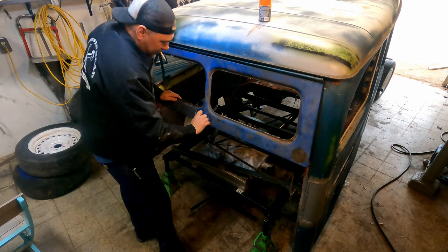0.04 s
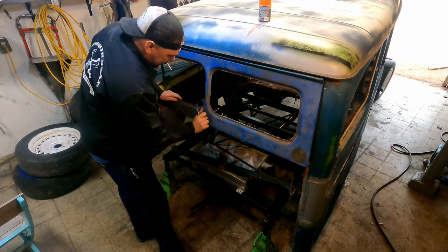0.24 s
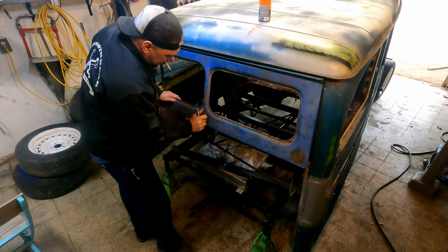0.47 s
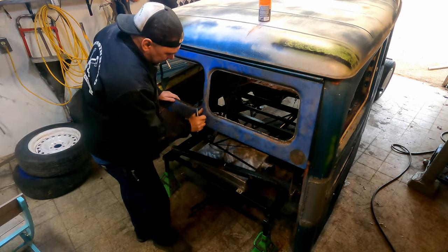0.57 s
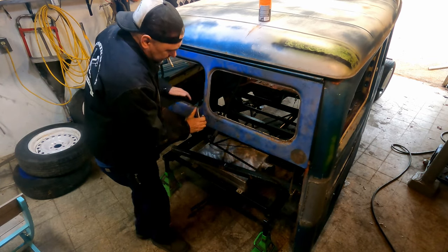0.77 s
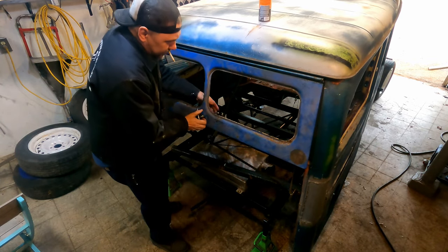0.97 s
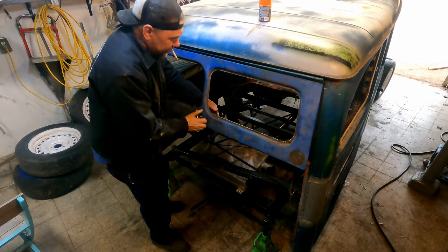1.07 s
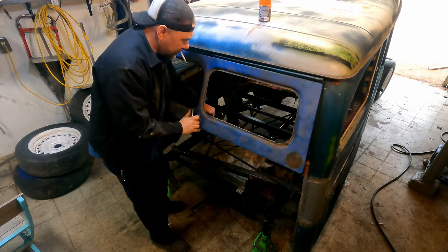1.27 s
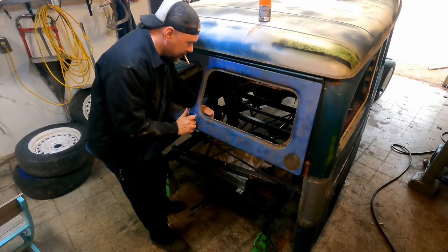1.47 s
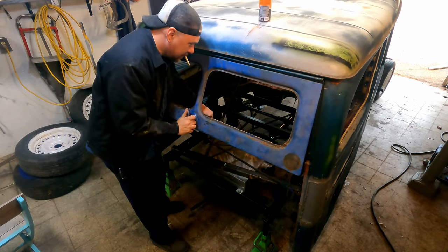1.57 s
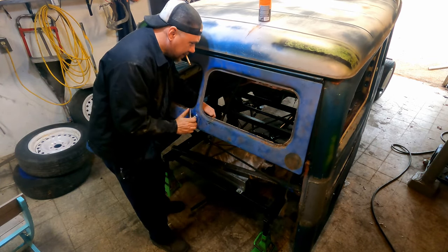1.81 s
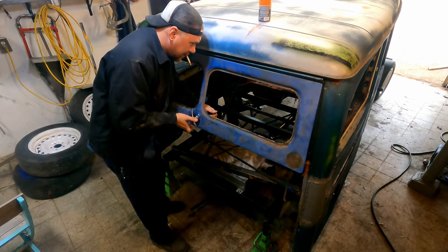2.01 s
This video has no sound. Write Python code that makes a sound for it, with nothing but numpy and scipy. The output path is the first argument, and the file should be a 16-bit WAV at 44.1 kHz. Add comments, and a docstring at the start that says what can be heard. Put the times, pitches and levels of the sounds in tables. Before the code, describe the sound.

A rusty crank handle is forced on a hollow steel car door, heard close in a small garage. Faint ticks first, then loud gritty clanks at 0.2 and 0.36 seconds, with a deep boom swelling until about 0.8. A tiny chirp at 0.7, softer scrapes near 0.9 and 1.06, a clunk with thin squeak at 1.55, and an abrupt dull thump at 1.74. Low airy rumble and faint hum continue behind.

```python
"""In a garage, a stiff rusty crank handle on a hollow steel car door is forced back and forth.
Each jerk rattles and scrapes the door skin: random grit excites noise bands and resonant modes.
The body booms low as a gliding sine with rough rumble, and the spindle squeaks in fluttering sine lines.
A tick and a low push make one thump; shaped noise and a faint hum lie behind, and feedback delays
give the garage its reverberation."""
import sys
import numpy as np
from scipy import signal
from scipy.fft import rfft, irfft
from scipy.io import wavfile

SR = 44100
rng = np.random.default_rng(int(sys.argv[2]) if len(sys.argv) > 2 else 0)


def transcribe(u):
    """Save the signal u as a 16-bit wav file named by the first command-line argument.

    u: samples, shape (n,) or (channels, n), limited to [-1, 1]; the rate is SR.
    q: integer samples, one column per channel.
    """
    v = np.clip(np.atleast_2d(u).T, -1, 1)
    q = np.round(v * 32767).astype(np.int16)
    wavfile.write(sys.argv[1], SR, q)


N = 90404

# Boom of the car body. Each row: time in seconds, level in dB, frequency in Hz.
BOOM_TRACK = [(0.0, -41, 66.7), (0.04, -28.5, 69.3), (0.07, -29.5, 68.0), (0.14, -44.5, 65.9),
              (0.23, -51, 71.3), (0.29, -39, 74.9), (0.34, -16.5, 69.7), (0.38, -14.5, 67.7),
              (0.42, -18, 66.4), (0.51, -13.5, 69.4), (0.63, -23.5, 67.3), (0.66, -13.5, 65.8),
              (0.75, -19, 68.1), (0.84, -33.5, 71.95), (0.89, -27.5, 73.2), (1.01, -24.5, 72.9),
              (1.05, -33.5, 72.1), (1.2, -34.5, 71.04), (1.27, -42.5, 72.9), (1.37, -29, 66.9),
              (1.41, -26.5, 66.5), (1.47, -42, 67.9), (1.52, -36, 68.4), (1.6, -36, 67.4),
              (1.63, -36.5, 67), (1.76, -44, 66.2), (1.79, -56, 67.8), (1.84, -32, 67.6), (1.92, -71.5, 66),
              (2.05, -31.5, 64.4)]
SHUDDER_DB, SHUDDER_LOW_HZ, SHUDDER_TOP_HZ = -7.5, 40, 67   # rumble, level relative to the boom tone
BOOM_SIDE_DB = -23

# Spectrum of the background noise. Each row: frequency in Hz, relative level per hertz in dB.
AIR_SPECTRUM = [(13, -35), (22, 0), (70, -1.5), (131, 1.5), (198, -11), (306, -12.5), (869, -30),
                (1050, -24), (1930, -23), (2830, -33.5), (5320, -30.5), (12100, -44), (15500, -84)]
# Slow swelling of the background. Each row: time in seconds, dB below AIR_SPLIT_HZ, dB above it.
AIR_SWELL = [(0, 2.5, -2), (0.199, -2.5, 3), (0.799, 10, 3.5), (1.0, 3, 1.5), (1.15, 4, 3), (1.3, 0, -1),
             (1.45, 4.5, 3.5), (1.75, 3.5, 3), (1.899, 3, 3), (2.05, -3.5, 2.5)]
AIR_DB, AIR_PATCHY_DB, AIR_SPLIT_HZ = -35, 0.8, 450
HUM_HZ, HUM_DB, HUM_WAVER_DB = 121.3, -38, 2.3

# Frequencies at which the level of each jerk is given, in Hz.
JERK_TONE_HZ = [300, 900, 2200, 5000, 10000]
# Jerks and scrapes of the handle. Each row: start in seconds, shortest rise in seconds, hold in seconds,
# decay t60 at 1000 Hz in seconds, then the level in dB at each of JERK_TONE_HZ.
JERKS = [(.046, 0.0031, 0.02, 0.31, -46.5, -43, -48.5, -52, -62.5),
         (.119, 0.0031, 0.0021, 0.026, -45.5, -64, -47, -44.5, -94),
         (.155, 0.012, 0.054, 0.44, -53, -52.5, -56, -76, -79),
         (0.215, .004, 0.016, 0.27, -30.5, -16.5, -18.5, -24, -62.5),
         (.258, 0.0028, 0.038, 0.28, -29.5, -26.5, -25.5, -44, -54.5),
         (0.355, 0.0035, 0.02, 0.23, -34, -22.5, -18, -24.5, -48.5),
         (0.364, 0.00413, 0.014, 0.5, -16, -21.5, -22, -24.5, -71),
         (0.604, 0.032, 0.043, 0.39, -39.5, -40.5, -33, -34, -50.5),
         (0.798, 0.021, .060, 0.59, -44, -59.5, -71, -74, -85),
         (.888, 0.015, 0.016, 0.35, -48.5, -54.5, -46, -44.5, -54),
         (1.063, 0.0086, 0.027, 0.32, -41.5, -39.5, -31.5, -36, -53),
         (1.458, 0.031, 0.022, 0.82, -42, -38.5, -53, -61, -80),
         (1.538, 0.00373, 0.029, 0.25, -44.5, -33.5, -39.5, -39, -57.5),
         (1.547, 0.00598, 0.043, 0.54, -41, -26, -40.5, -60, -70),
         (1.682, 0.033, 0.017, 0.44, -32, -31.5, -53, -53.5, -77),
         (1.900, 0.043, 0.082, 0.47, -36, -49, -47.5, -99, -79)]
DECAY_TILT = -0.12   # t60 goes as (Hz / 1000) to this power
LOW_FALL_DB, HIGH_FALL_DB = 17, 28   # per octave outside JERK_TONE_HZ
LOW_LATE_S = 0.019   # added to the rise at 300 Hz, growing with the square of the period
GRITS_PER_S, GRIT_SPREAD_DB, GRIT_CLUMP_DB = 5000, 3, -1
# Modes of the door skin. Each row: frequency in Hz, relative level in dB, decay t60 in seconds.
SKIN_MODES = [(233, 0, 0.29), (266, -2, 0.217), (310.7, 4, 0.35), (400.4, -21.5, 0.45), (456, -1, 0.12),
              (659, -3, 0.17), (722, -7.5, 0.2), (930, -3, 0.11), (1019, -4, 0.13), (1118, -5.5, 0.13),
              (1316, -3, 0.21), (1582, -7.5, 0.11), (1787, -5, 0.3), (2233, -15, 0.14), (2490, -11.5, 0.2),
              (3193, -14.5, 0.18), (3715, -6, 0.18), (4283, -5, .04)]
SKIN_DB = -4
KNOCK_DB, KNOCK_RISE_S = 22.5, 0.0076   # the knock weakens by a factor e for each KNOCK_RISE_S of rise

# Lines of the squeak and of the short chirps and faint lines around it. Each row: start in seconds,
# hold in seconds, frequency in Hz, level in dB, decay t60 in seconds.
SQUEAK_LINES = [(1.57, .06, 1986, -34, .45), (1.541, .03, 3466, -43, .3), (1.541, .012, 4010, -40, .42),
                (1.541, .05, 4484, -44, .28), (1.541, .055, 4987, -43, .25), (1.541, .03, 5544, -41, .45),
                (1.375, .035, 1590, -50, .1), (1.462, .045, 4107, -56, .1), (1.40, .04, 5402, -58, .15),
                (1.548, .04, 1547, -30, .2), (.05, .015, 2600, -46, .08), (1.68, .04, 5100, -57, .3),
                (.688, .012, 2060, -32, .08), (.119, .003, 3700, -41, .04)]
SQUEAK_RISE_S, SQUEAK_FLUTTER_DB, SQUEAK_FLUTTER_HZ = 0.004, 3, 55
SPINDLE_LEAN_DB = -2   # left minus right

TICK_S, TICK_DB, TICK_HZ, TICK_T60_S = 1.7428, -9, 700, 0.010
SNAP_DB, SNAP_T60_S, SNAP_TOP_HZ = -25, 0.004, 7000
THUMP_S, THUMP_LENGTH_S, THUMP_DB = 1.7446, 0.0037, -3.5
THUMP_SKEW, REBOUND_HZ = 0.65, 22   # a skew below 1 brings the peak of the push forward

# Likeness of the two sides. Each row: frequency in Hz, left-right correlation from 0 to 1.
LIKENESS = [(60, 1), (130, 1), (290, 0.98), (640, 0.72), (1410, 0.67), (3100, 0.32), (6820, 0.99),
            (15000, 0.46)]
# Balance of the two sides. Each row: frequency in Hz, left minus right in dB.
LEAN = [(60, 2.5), (240, 0.5), (950, 0), (3770, 1), (15000, 2.5)]
LEFT_LAG_S = 0.000014
GARAGE_T60_S, GARAGE_DB, WALL_CUT_HZ = 0.31, -25.5, 6300   # t60 before the walls dull the treble
CEILING, CUTOFF_HZ = 1.1, 15750


def from_db(db):
    """Amplitude gain is ten to the power of a twentieth of the decibels."""
    return 10 ** (np.asarray(db) / 20)


def rms_one(x):
    """Normalise the signal power: scale to rms 1."""
    return x / np.sqrt(np.mean(x ** 2) + 1e-20)


def at_hz(points, hz):
    """Interpolate a table on a logarithmic frequency axis, linear in octaves."""
    table = np.array(points)
    return np.interp(np.log(hz), np.log(table[:, 0]), table[:, 1])


def drift(rate_hz):
    """Low-pass filtered noise varies slowly at random: two equal poles at rate_hz, rms 1."""
    step = 20  # computed at every 20th sample, then interpolated
    r = np.exp(-2 * np.pi * rate_hz * step / SR)
    white = rng.standard_normal(N // step + 2002)
    slow = rms_one(signal.lfilter([1], [1, -2 * r, r * r], white)[2000:])
    return np.interp(np.arange(N) / step, np.arange(len(slow)), slow)


def swell(start, rise, hold, t60):
    """Energy builds linearly in amplitude, holds, then decays by 60 dB per t60; cut off after 90 dB."""
    out, first = np.zeros(N), int(start * SR)
    length = min(N - first, int((rise + hold + 1.5 * t60) * SR))
    t = np.arange(length) / SR
    attack = np.minimum(t / max(rise, 1e-4), 1)
    decay = from_db(-60 * np.maximum(t - rise - hold, 0) / t60)
    out[first:first + length] = attack * decay
    return out


def pair(mid, side, hz):
    """Stereo correlation: a shared and an opposed signal mix to the likeness and lean at that pitch."""
    alike, half_lean = np.clip(at_hz(LIKENESS, hz), 0, 1), at_hz(LEAN, hz) / 2
    shared = np.sqrt((1 + alike) / 2) * mid
    opposed = np.sqrt((1 - alike) / 2) * side * [[1], [-1]]
    return (shared + opposed) * from_db([[half_lean], [-half_lean]])


def bands(sources, low_hz):
    """Half-octave band analysis of two (mid, side) sources in turn; yields each centre and stereo band."""
    edges = low_hz * 2 ** np.arange(0, np.log2(17000 / low_hz), 0.5)
    for k, (low, high) in enumerate(zip(edges, edges[1:])):
        sos = signal.butter(3, [low, high], "band", fs=SR, output="sos")
        mid, side = signal.sosfilt(sos, sources[k % 2])
        hz = np.sqrt(low * high)
        yield hz, pair(rms_one(mid), rms_one(side), hz)


def boom():
    """Low resonance of the body: a near-sine of gliding pitch, with band noise under the same envelope."""
    s, level_db, hz = np.transpose(BOOM_TRACK)
    t = np.arange(N) / SR
    phase = 2 * np.pi * np.cumsum(np.interp(t, s, hz)) / SR
    tone = np.sqrt(2) * np.sin(phase)
    sos = signal.butter(2, [SHUDDER_LOW_HZ, SHUDDER_TOP_HZ], "band", fs=SR, output="sos")
    settled = signal.sosfilt(sos, rng.standard_normal(N + SR))[SR:]
    rumble = from_db(SHUDDER_DB) * rms_one(settled)
    return from_db(np.interp(t, s, level_db)) * (tone + rumble)


def air():
    """Broadband noise shaped in half-octave bands, each swelling slowly, with a mains hum as a wavering sine."""
    white, t = rng.standard_normal((2, 2, N)), np.arange(N) / SR
    s, low_db, high_db = np.transpose(AIR_SWELL)
    noise = np.zeros((2, N))
    for hz, band in bands(white, low_hz=23.54):
        swell_db = np.interp(t, s, low_db if hz < AIR_SPLIT_HZ else high_db)
        level_db = at_hz(AIR_SPECTRUM, hz) + AIR_PATCHY_DB * drift(7.4) + swell_db
        noise += from_db(level_db) * np.sqrt(hz) * band  # bandwidth grows with hz
    hum = from_db(HUM_DB + HUM_WAVER_DB * drift(8.8)) * np.sin(2 * np.pi * HUM_HZ * t)
    return from_db(AIR_DB) * rms_one(noise) + hum


def low_rise(rise, hz):
    """Low frequencies build up later: the added rise goes as the square of the period."""
    return rise + LOW_LATE_S * (300 / hz) ** 2


def effort(hz):
    """Incoherent sources add in power: the strength of all jerks at one frequency, over time."""
    power = np.zeros(N)
    octaves_below = min(np.log2(hz / JERK_TONE_HZ[0]), 0)  # negative
    octaves_above = max(np.log2(hz / JERK_TONE_HZ[-1]), 0)
    outside_db = LOW_FALL_DB * octaves_below - HIGH_FALL_DB * octaves_above
    for s, rise, hold, t60, *levels in JERKS:
        level_db = np.interp(np.log(hz), np.log(JERK_TONE_HZ), levels) + outside_db
        envelope = swell(s, low_rise(rise, hz), hold, t60 * (hz / 1000) ** DECAY_TILT)
        power += (from_db(level_db) * envelope) ** 2
    return np.sqrt(power)


def rust_grit():
    """Stick-slip friction: dense random impulses of uneven size and either sign, in loose clumps."""
    shape = (2, 2, N)
    sizes = from_db(GRIT_SPREAD_DB * np.minimum(rng.exponential(1, shape), 4))
    signs = rng.choice([-1, 1], shape)
    slips = rng.random(shape) < GRITS_PER_S / SR
    return sizes * signs * slips * from_db(GRIT_CLUMP_DB * drift(47.4)) + 1e-18


def door():
    """Forced vibration of a plate: grit gives a broad rattle and rings the modes; sudden jerks also strike them."""
    grit = rust_grit()
    out = sum(effort(hz) * band for hz, band in bands(grit, low_hz=99.5))
    s, rise = np.transpose(JERKS)[:2]
    for k, (hz, level_db, t60) in enumerate(SKIN_MODES):
        # one knock at the end of each rise; slower rises strike less
        knocks, full = np.zeros((2, N)), s + low_rise(rise, hz)
        strike = np.minimum(full * SR, N - 1).astype(int)
        knocks[0, strike] = from_db(KNOCK_DB) * np.exp(-rise / KNOCK_RISE_S)
        knocks *= (-1) ** k * np.sqrt(SR / hz)
        # two-pole resonator
        r, w = from_db(-60 / (t60 * SR)), 2 * np.pi * hz / SR
        push = (grit[k % 2] / grit.std() + knocks) * effort(hz) * 2 * np.sqrt(1 - r)
        mid, side = signal.lfilter([0, np.sin(w)], [1, -2 * r * np.cos(w), r * r], push)
        out = out + from_db(SKIN_DB + level_db) * pair(mid, side, hz)
    return out


def spindle():
    """Superposition of fluttering sine lines makes the squeak; short chirps and faint lines lie around it."""
    t, out = np.arange(N) / SR, np.zeros(N)
    for s, hold, hz, level_db, t60 in SQUEAK_LINES:
        flutter = from_db(level_db + SQUEAK_FLUTTER_DB * drift(SQUEAK_FLUTTER_HZ))
        line = np.sin(2 * np.pi * (hz * t + rng.random()))
        out += flutter * swell(s, SQUEAK_RISE_S, hold, t60) * line
    return out * from_db([[SPINDLE_LEAN_DB / 2], [-SPINDLE_LEAN_DB / 2]])


def thump():
    """Impulse and recoil: a tick of damped sine and noise, then a low push that springs back slowly."""
    t = np.arange(N) / SR
    since_tick = np.clip(t - TICK_S, 0, 0.1)
    tick = from_db(TICK_DB - 60 * since_tick / TICK_T60_S) * np.sin(2 * np.pi * TICK_HZ * since_tick)
    snap = from_db(SNAP_DB - 60 * since_tick / SNAP_T60_S) * (since_tick > 0) * rng.standard_normal(N)
    snap = signal.lfilter(*signal.butter(3, SNAP_TOP_HZ, fs=SR), snap)
    progress = np.clip((t - THUMP_S) / THUMP_LENGTH_S, 0, 1)
    push = -from_db(THUMP_DB) * np.sin(np.pi * progress ** THUMP_SKEW)
    push = signal.lfilter(*signal.butter(1, REBOUND_HZ, "high", fs=SR), push)  # gives the rebound
    return push + snap - tick


def garage(x):
    """Reverberation by repeated reflection: eight feedback delays a side, duller on every round."""
    out, dull = np.zeros((2, N)), np.exp(-2 * np.pi * WALL_CUT_HZ / SR)
    lags = (rng.uniform(0.02, 0.054, 16) * SR).astype(int)
    for k, lag in enumerate(lags):
        loop, state = x.copy(), [0.]
        gain = from_db(-60 * lag / SR / GARAGE_T60_S)
        for i in range(lag, N, lag):
            last_round = loop[i - lag:i]
            back, state = signal.lfilter([gain * (1 - dull)], [1, -dull], last_round, zi=state)
            loop[i:i + lag] += back[:N - i]
        out[k % 2] += (loop - x) * (-1) ** (k // 2)
    return out


def scene():
    """Superposition of all sources, with reverberation of the near ones and a slight lag on the left."""
    low, background = boom(), air()
    near = door() + spindle() + thump()
    reverberation = from_db(GARAGE_DB) * garage(near.mean(axis=0))
    # the boom 10 ms later off one wall, opposed in the two sides
    across = from_db(BOOM_SIDE_DB) * np.roll(low, SR // 100) * [[1], [-1]]
    left, right = near + reverberation + low + across + background
    bin_hz = np.arange(N // 2 + 1) * SR / N
    lag = np.exp(-2j * np.pi * bin_hz * LEFT_LAG_S)
    return np.array([irfft(rfft(left) * lag, N), right])


def record(dry):
    """Saturation rounds the peaks toward the ceiling, then a steep low-pass filter cuts the top."""
    rounded = dry / (1 + np.abs(dry / CEILING) ** 4) ** 0.25
    sos = signal.cheby2(12, 70, CUTOFF_HZ, fs=SR, output="sos")  # 70 dB down from CUTOFF_HZ up
    return np.clip(signal.sosfilt(sos, rounded), -1, 1)


dry = scene()
out = record(dry)
transcribe(out)
```